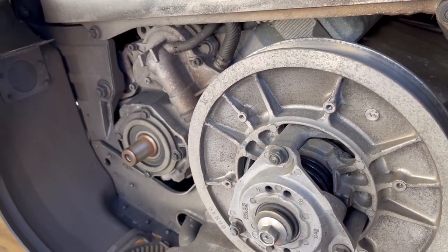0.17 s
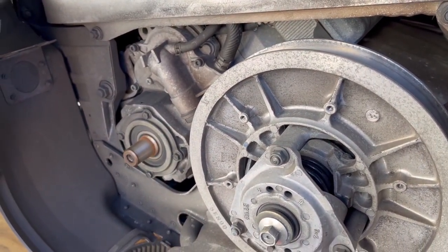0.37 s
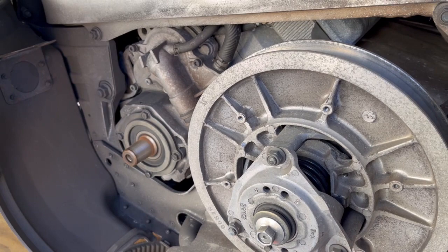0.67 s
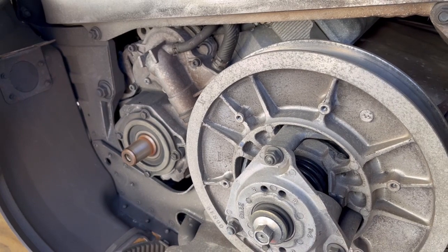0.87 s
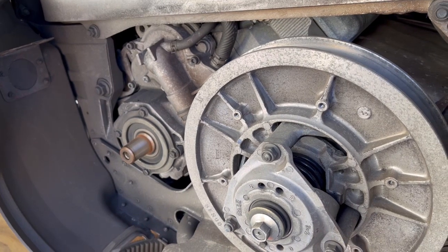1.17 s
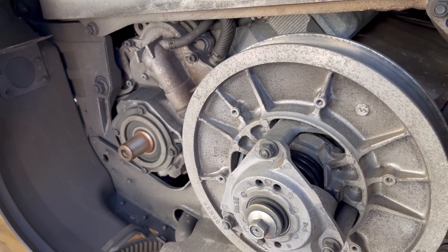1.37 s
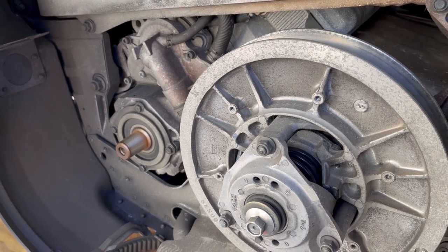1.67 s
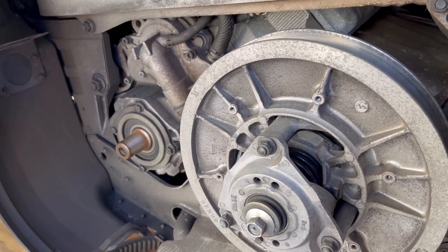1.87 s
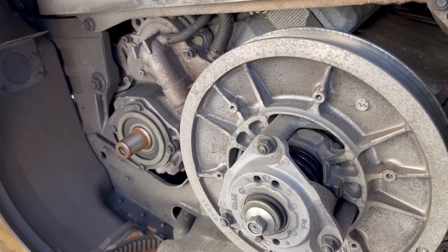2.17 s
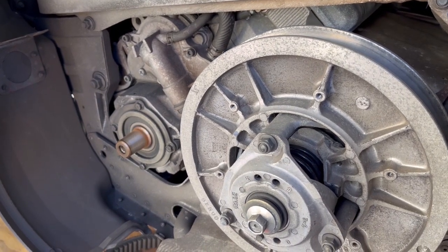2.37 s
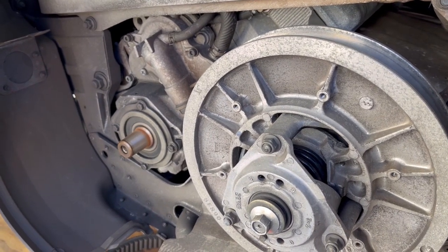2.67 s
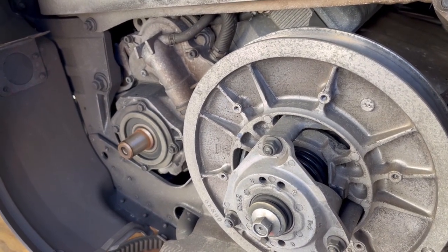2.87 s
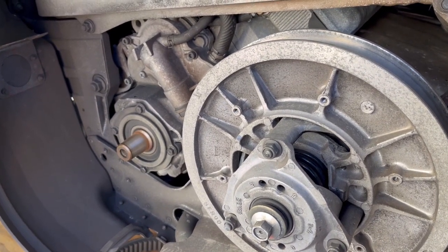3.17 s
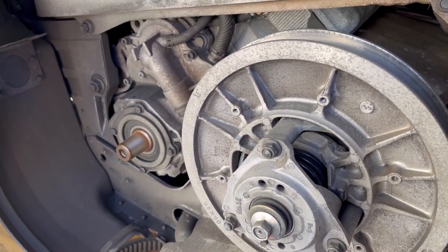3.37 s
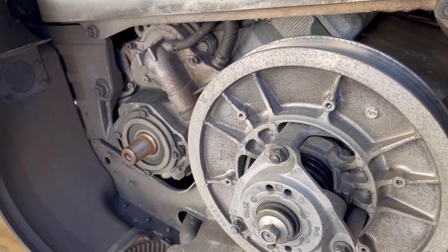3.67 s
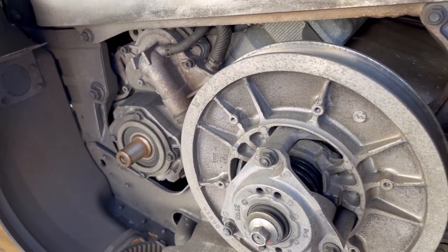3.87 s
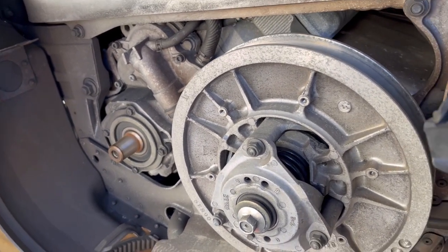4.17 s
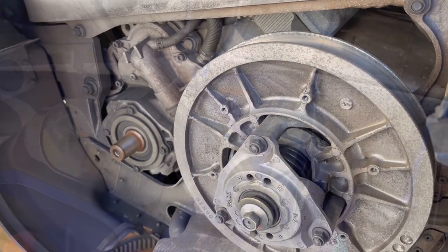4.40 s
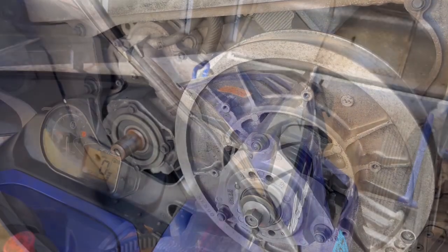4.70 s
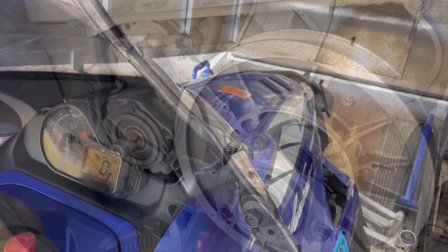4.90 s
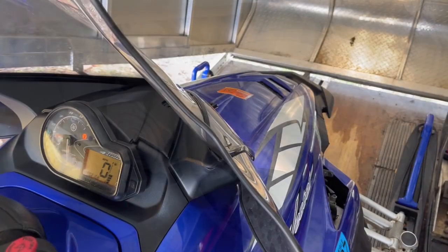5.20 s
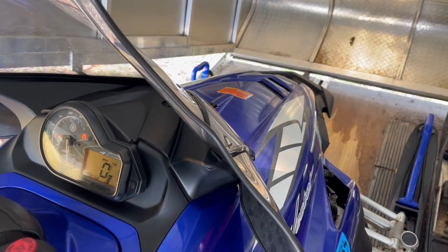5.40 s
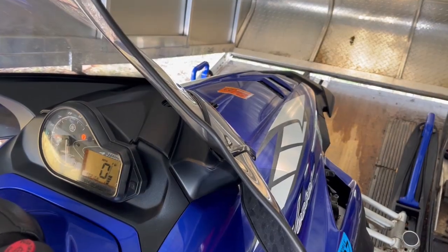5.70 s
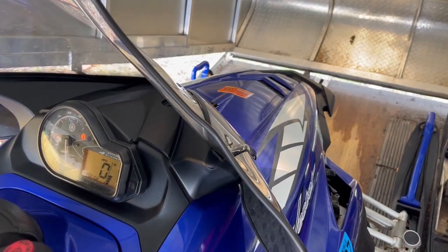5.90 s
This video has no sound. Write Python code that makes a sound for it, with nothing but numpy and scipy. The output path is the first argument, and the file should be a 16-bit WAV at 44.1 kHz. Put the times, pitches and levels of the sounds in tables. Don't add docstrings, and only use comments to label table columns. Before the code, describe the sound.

Close, rattly four-stroke idle with hum, knocking and faint whine; a tiny silence and tick, then deep pulsing booms and dull clatter in a metal box.

```python
import sys
import numpy as np
from scipy import signal
from scipy.fft import rfft, irfft, next_fast_len
from scipy.io import wavfile
from scipy.ndimage import uniform_filter1d

SR = 44100
rng = np.random.default_rng(int(sys.argv[2]) if len(sys.argv) > 2 else 0)


def digitize_waveform(pressure):
    field = np.atleast_2d(pressure).T
    bounded = np.clip(field, -1, 1)
    quanta = np.round(bounded * 32767).astype(np.int16)
    wavfile.write(sys.argv[1], SR, quanta)


def makeup_ratio(level_db):
    decades = np.asarray(level_db, float) / 20
    return 10 ** decades


N = 266672

# start_s, end_s
GAP_S = (4.769, 4.8173)
# centre_s, half_length_s, boom_peak_db, boom_hz, clatter_rise_db
FIRING_RUNS = [
    (4.836, 0.057, -14.5, 76, 3.5),
    (4.971, 0.061, -15.5, 76, 0.5),
    (5.071, .08, -15, 71, 2),
    (5.235, 0.086, -12, 73.5, 4),
    (5.397, 0.057, -16, 74, 4.5),
    (5.54, 0.086, -15.5, 72.5, 1),
    (5.704, 0.073, -14.5, 76, 5.5),
    (5.819, 0.059, -13.5, 77, 2.5),
    (5.962, 0.071, -15, 74, 3.5),
    (6.05, 0.034, -17, 78, 9),
]


def curve(rows):
    s, value = np.transpose(rows)
    return np.interp(np.arange(N) / SR, s, value)


def drift(rate):
    r = np.exp(-40 * np.pi * rate / SR)
    coarse = rng.standard_normal(N // 20 + 3002)
    slow = signal.lfilter([1], [1, -2 * r, r * r], coarse)[3000:]
    return np.interp(np.arange(N) / 20, np.arange(len(slow)), slow / slow.std())


def bumps(times, heights, spread_s):
    t = np.arange(N) / SR
    return sum(h * np.exp(-((t - s) / spread_s) ** 2) for s, h in zip(times, heights))


def panned(x, pan_db):
    return x * makeup_ratio(np.array([[pan_db / 2], [-pan_db / 2]]))


def idle_controls():
    # time_s, speed_cycles_per_s
    idle_speed = [(0.02, 21.3), (0.45, 21.7), (0.56, 21.3), (0.8, 21.9), (0.98, 21.5), (1.2, 21.5),
                  (1.51, 22.1), (2.15, 21.4), (2.3, 21.8), (2.39, 21.2), (2.51, 21.1), (2.65, 22.3),
                  (2.83, 21.7), (3.17, 21.2), (3.96, 21.7), (4.13, 22.2), (4.41, 21.4), (4.75, 21.6)]
    # time_s, kick_cycles_per_s
    crank_kicks = [(1.15, -0.11), (1.31, 0.14), (1.61, -0.12), (1.68, 0.024), (2.18, -0.37), (2.85, -0.36),
                   (2.91, 0.22), (3.41, .4), (3.609, -0.44), (3.74, 0.13), (4.56, 0.3), (4.64, -0.26)]
    # time_s, level_db
    nearness = [(0, -35), (1.1, -33.5), (1.5, -33), (2.4, -33), (3.3, -32.5), (3.8, -32.5), (4.2, -31.5),
                (4.77, -32.5)]
    mean_cycle_hz, kick_s, lope_lag_s = 21.725, 0.037, 0.03
    noise_db_per_hz, lope_db_per_hz, whine_db_per_hz = -0.6, 7.0, 5.5
    lope_wander_db, whine_wander_db = -1, 1.5

    t = np.arange(N) / SR
    speed_hz = curve(idle_speed) + bumps(*np.transpose(crank_kicks), kick_s)
    excess_hz = speed_hz - mean_cycle_hz
    late_excess_hz = np.interp(t - lope_lag_s, t, excess_hz)
    near_db = curve(nearness)
    noise_db = near_db + noise_db_per_hz * excess_hz + 0.2 * drift(4.1)
    lope_db = 0.39 * (near_db + 33) + lope_db_per_hz * late_excess_hz + lope_wander_db * drift(9.9)
    whine_db = 0.55 * (near_db + 35.5) + whine_db_per_hz * excess_hz + whine_wander_db * drift(16.0)
    return speed_hz, noise_db, lope_db, whine_db


def engine_orders(cycle, cycle_hz, swell_db, lope_db):
    # multiple, level_db, left_minus_right_db, wander_db
    order_lines = [(3, -34, 3.5, 2.5), (4, -35, -2.5, 2.5), (5, -37.5, -.5, 2), (6, -25, -2, .8),
                   (7, -43, 1, 2), (9, -46, -1, 1), (10, -45, -2, 1), (12, -29.3, 4, 1), (15, -35, -1, 1),
                   (18, -29, -.5, 1), (21, -43, 0, 2)]
    out = 0
    for multiple, level_db, pan_db, wander_db in order_lines:
        skew = 0.3 + 0.189 * multiple ** 2 + 0.1 * wander_db * drift(6)
        lag = 0.032 * multiple * np.array([[-0.5], [0.5]])
        wave = np.cos(2 * np.pi * multiple * cycle + skew + lag)
        effort_db = lope_db if multiple < 5 else swell_db
        if multiple == 6:
            effort_db = effort_db - 8.4 * np.maximum(cycle_hz - 21.6, 0)
        line_db = level_db + 3.0 + effort_db + wander_db * drift(15.7)
        out = out + panned(makeup_ratio(line_db) * wave, pan_db)
    return out


def cover_whines(cycle, cycle_hz, whine_db):
    # centre_hz, width_hz, level_db, left_minus_right_db
    covers = [(919, 34.7, -36, 2.5), (1038, 38, -35, 3.5)]
    off_stroke_db = -4.5
    out = 0
    for centre_hz, width_hz, level_db, pan_db in covers:
        nearest = round(centre_hz / cycle_hz[:4 * SR].mean())
        for multiple in range(nearest - 2, nearest + 3):
            detune = 2 * (multiple * cycle_hz - centre_hz) / width_hz
            resonance = 1 / (1 + detune ** 2) ** 2
            flicker_db = 1.6 * drift(20) + off_stroke_db * (multiple % 6 > 0)
            waver = 0.45 * drift(14)
            phase = 2 * np.pi * multiple * cycle + waver + np.array([[0], [0.9]])
            gain = makeup_ratio(level_db + 4 + whine_db + flicker_db)
            out = out + panned(resonance * gain * np.cos(phase), pan_db)
    return out


def contact_bursts(cycle, decay_s, scatter_db):
    # cycle_share, level_db
    contacts = [
        (0.078, -8),
        (.17, -22),
        (0.301, -5.5),
        (0.503, -23),
        (.56, -8),
        (0.668, 7.5),
        (.8, -18),
        (.96, -13),
    ]
    clicks = np.zeros(N)
    turns = np.arange(int(cycle[-1]))
    for share, level_db in contacts:
        at = np.searchsorted(cycle, turns + share + rng.normal(0, 0.007, len(turns)))
        strength_db = level_db + scatter_db * rng.standard_normal(len(turns))
        clicks[np.minimum(at, N - 1)] += makeup_ratio(strength_db)
    return signal.lfilter([1], [1, -np.exp(-1 / (decay_s * SR))], clicks)


def colour_db(hz, spectrum, resonances):
    points = np.array(spectrum)
    level = np.interp(np.log(hz), np.log(points[:, 0]), points[:, 1])
    return level + sum(db / (1 + (2 * (hz - f) / width) ** 2) for f, width, db in resonances)


def two_ports(hz, common, own):
    # freq_hz, likeness_0_to_1, right_lead_rad, left_minus_right_db
    ports = [(30, .95, 0, 0), (300, .7, .2, 1), (900, .5, .6, 1.5), (1500, .7, 2.3, -1),
             (1800, .65, -.2, 3), (2400, .68, -.4, 5), (3100, .45, -.9, 5.5), (3500, .72, -.3, 3.5),
             (4800, .65, 0, 4), (7200, .55, 2.2, 0), (8300, .78, 3.14, 0), (11800, .78, 6.28, 0),
             (13800, .45, 7.8, 0), (15200, .7, 9.42, 0)]
    port_hz, alike, lead_rad, pan_db = np.transpose(ports)
    alike = np.clip(np.interp(hz, port_hz, alike), 0, 1)
    lead = np.exp(1j * np.interp(hz, port_hz, lead_rad))
    right = alike * common * lead + np.sqrt(1 - alike ** 2) * own
    tilt = makeup_ratio(np.interp(hz, port_hz, pan_db) / 2)
    return np.array([common * tilt, right / tilt])


def machine_noise(cycle, level_db, colour, band_hz, burst, throb_db, patchy_db, low_cut_hz):
    size = next_fast_len(N)
    hz = np.maximum(np.arange(size // 2 + 1) * SR / size, 1)
    bursts = contact_bursts(cycle, decay_s=0.0014, scatter_db=5.0)
    together = drift(13.0)
    slow_db = uniform_filter1d(level_db, size=SR // 2)
    throb = throb_db * np.cos(2 * np.pi * (cycle - 0.02)) + level_db - slow_db
    gusts_db = 0.85 * drift(8)
    common, own = 0, 0
    for k in range(10):
        octaves = np.log2(hz / 31.25) - k
        window = np.cos(np.pi / 2 * np.clip(octaves, -1, 1))
        bright = np.clip((k - 3) / 3, 0, 1)
        patches_db = patchy_db * (0.71 * together + 0.22 * drift(14.0))
        gate = (1 + burst * bright * bursts) * makeup_ratio(bright * (throb + gusts_db) + patches_db)
        gate = gate / np.sqrt(np.mean(gate ** 2))
        a, b = rfft(rng.standard_normal((2, N)) * gate, size) * window
        common, own = common + a, own + b
    gain = makeup_ratio(colour_db(hz, *colour)) / (1 + (low_cut_hz / hz) ** 4)
    pair = two_ports(hz, common, own) * gain
    inside = (hz > band_hz[0]) & (hz < band_hz[1])
    rms = np.sqrt(2 * np.sum(np.abs(pair.mean(axis=0)[inside]) ** 2) / size / N)
    return makeup_ratio(slow_db) * irfft(pair / rms, size)[:, :N]


def open_engine_noise(cycle, noise_db):
    # freq_hz, level_db_per_hz
    open_spectrum = [(25, -24), (45, -10), (80, -3), (150, -4.5), (230, -1), (500, -8), (1000, -12.5),
                     (2000, -15), (4000, -18.5), (6000, -23), (7500, -26.5), (11000, -27), (14000, -32),
                     (15700, -45)]
    # freq_hz, width_hz, height_db
    casing = [(78, 16, 15.5), (216, 33, -11), (573, 12, 7), (1100, 210, 5), (1518, 217, 9), (1879, 59, 8.5),
              (2150, 170, 2), (2626, 94, 7.5), (2910, 160, 4), (3640, 174, 7.5), (4660, 81, 5.5),
              (5310, 350, 3), (8600, 120, 5), (3100, 81, 2.5), (730, 27, 4)]
    return machine_noise(cycle, noise_db, (open_spectrum, casing), (1200, 7000),
                         burst=0.28, throb_db=0.62, patchy_db=-0.5, low_cut_hz=31)


def trailer_clatter():
    # freq_hz, level_db_per_hz
    boxed_spectrum = [(25, 1), (60, 5.5), (100, 3.5), (200, -5.5), (400, -8), (550, -15.5), (1500, -16),
                      (2500, -24.5), (5000, -33), (6500, -39.5), (10000, -41.5), (12000, -46.5),
                      (14000, -48), (15700, -58)]
    # freq_hz, width_hz, height_db
    walls = [(48, 20, -1), (145.5, 17, 4.5), (190.5, 42, 5), (331.7, 23, 6), (352.6, 24, 6.5),
             (1007, 13, 11), (1140, 250, 4), (1510, 150, 8), (2195, 20, 11.5)]
    cycle_hz, floor_db, lag_s, spread_s = 20, -36.5, 0.024, 0.041
    cycle = np.cumsum(cycle_hz * (1 + 0.01 * drift(4.4))) / SR
    runs = np.transpose(FIRING_RUNS)
    clatter_db = floor_db + bumps(runs[0] + lag_s, runs[-1], spread_s)
    return machine_noise(cycle, clatter_db, (boxed_spectrum, walls), (900, 7000),
                         burst=0.3, throb_db=0.5, patchy_db=0.8, low_cut_hz=26)


def trailer_boom():
    t, out = np.arange(N) / SR, np.zeros(N)
    rise_hz_per_s = 45
    starts_rad = rng.uniform(0, 2 * np.pi, len(FIRING_RUNS))
    for (centre_s, half_s, peak_db, hz, _), start_rad in zip(FIRING_RUNS, starts_rad):
        since = t - centre_s
        swell = np.cos(np.pi / 2 * np.clip(since / half_s, -1, 1))
        phase = 2 * np.pi * (hz + rise_hz_per_s * since) * since + start_rad
        out += makeup_ratio(peak_db) * swell * np.sin(phase)
    return out


def scene():
    t = np.arange(N) / SR
    speed_hz, noise_db, lope_db, whine_db = idle_controls()
    cycle_hz = speed_hz * (1 + 0.003 * drift(12))
    cycle = np.cumsum(cycle_hz) / SR
    swell_db = 0.95 * uniform_filter1d(noise_db + 34.0, size=SR // 2)
    near = engine_orders(cycle, cycle_hz, swell_db, lope_db)
    near = near + cover_whines(cycle, cycle_hz, whine_db)
    near = near + open_engine_noise(cycle, noise_db)
    boxed = trailer_clatter() + trailer_boom()

    gap_start_s, gap_end_s = GAP_S
    fade_s, join_s, tick_s = 0.004, 0.001, 0.0002
    since = np.maximum(t - gap_end_s, 0)
    fade_out = np.clip((gap_start_s - t) / fade_s + 0.35, 0, 1) * (t < gap_start_s)
    fade_in = 1 - np.exp(-since / join_s)
    tick = -0.17 * (since > 0) * np.exp(-since / tick_s)
    return near * fade_out + boxed * fade_in + tick


def roll_off(x):
    return signal.sosfilt(signal.butter(12, 15710, fs=SR, output="sos"), x)


def record(dry):
    # low_hz, high_hz
    sum_lost = [(7750, 8850), (14500, 20000)]
    # low_hz, high_hz
    difference_lost = [(11050, 12750)]
    top_hz = 15750
    hz = np.arange(N // 2 + 1) * SR / N
    halves = rfft([dry[0] + dry[1], dry[0] - dry[1]]) / 2
    for half, lost in enumerate((sum_lost, difference_lost)):
        for low, high in lost:
            halves[half, (hz > low) & (hz < high)] = 0
    total, difference = irfft(halves * (hz < top_hz), N)
    t = np.arange(N) / SR
    sounding = (t < GAP_S[0]) | (t > GAP_S[1])
    pair = np.array([total + difference, total - difference]) * sounding
    return roll_off(pair)


dry = scene()
out = record(dry)
digitize_waveform(out)
```